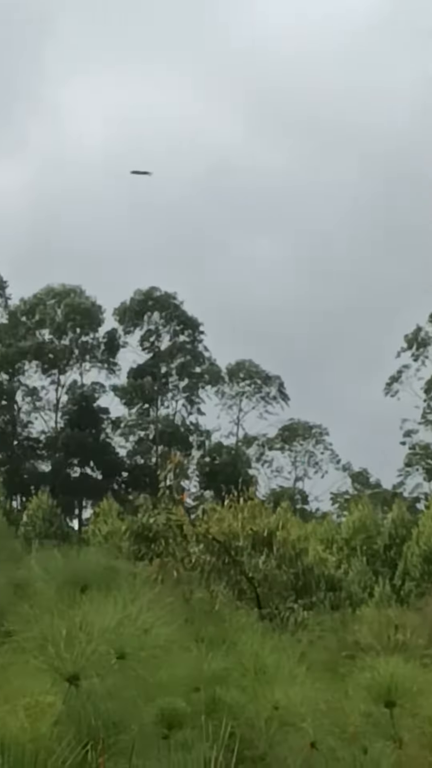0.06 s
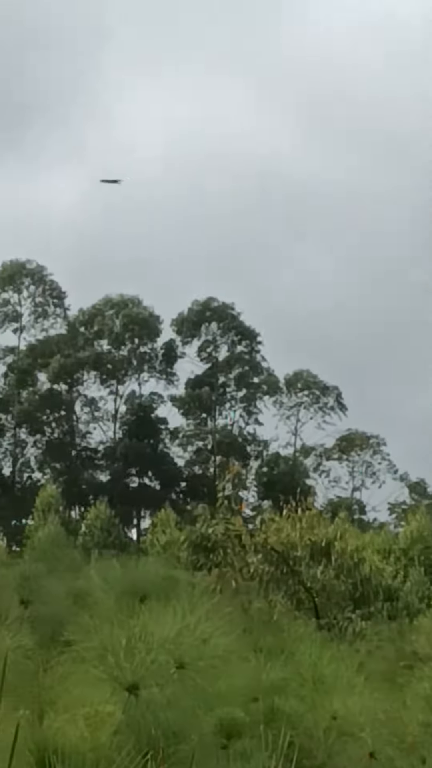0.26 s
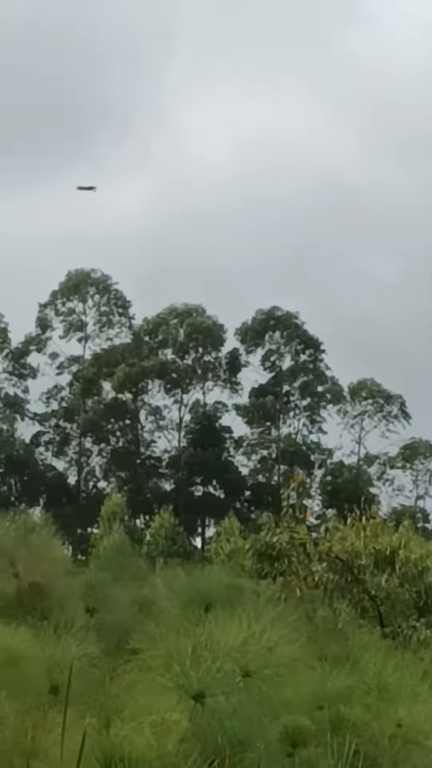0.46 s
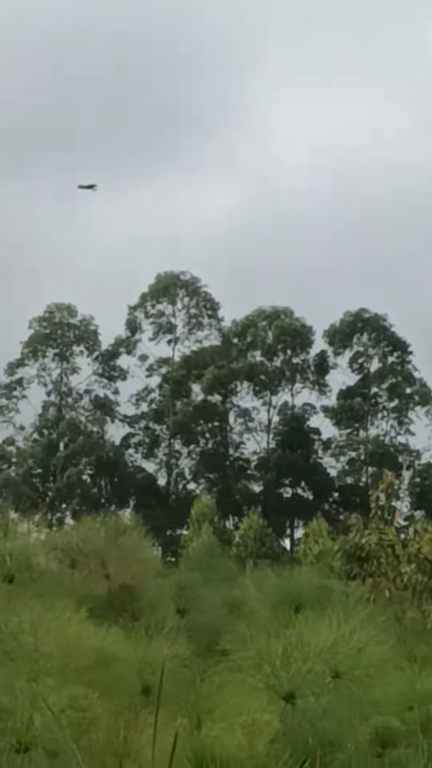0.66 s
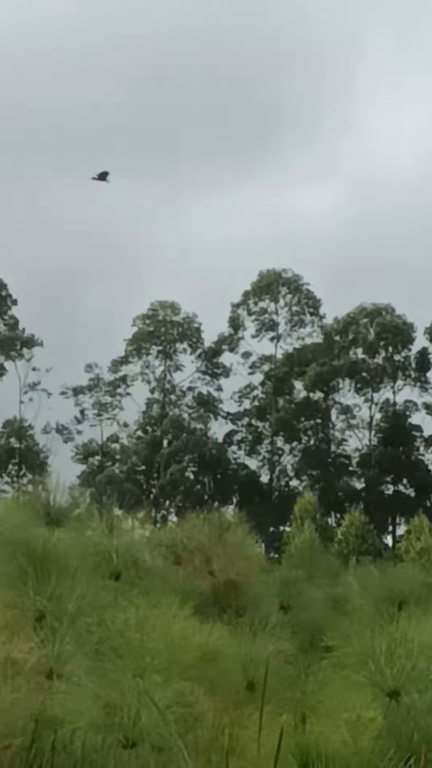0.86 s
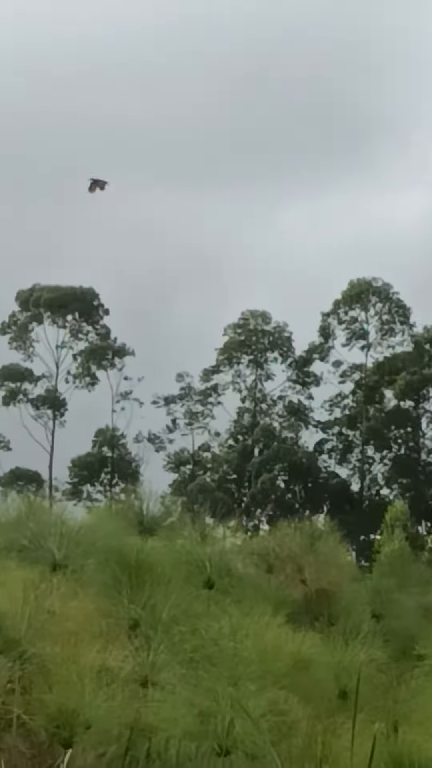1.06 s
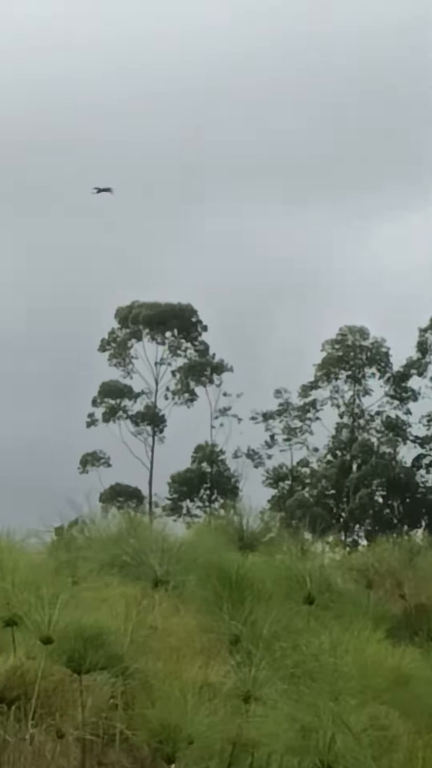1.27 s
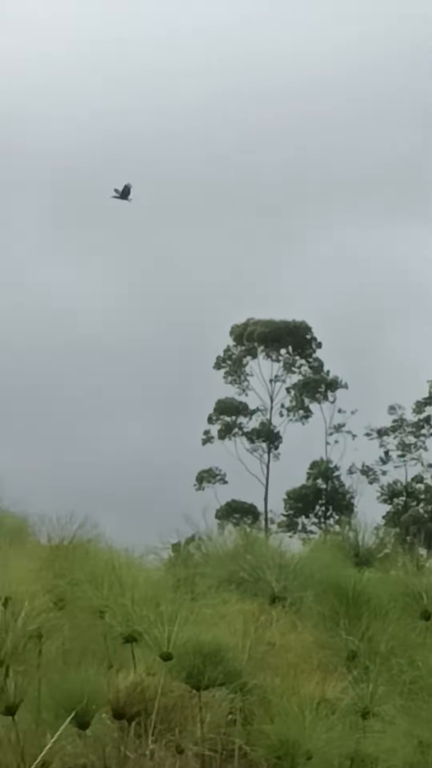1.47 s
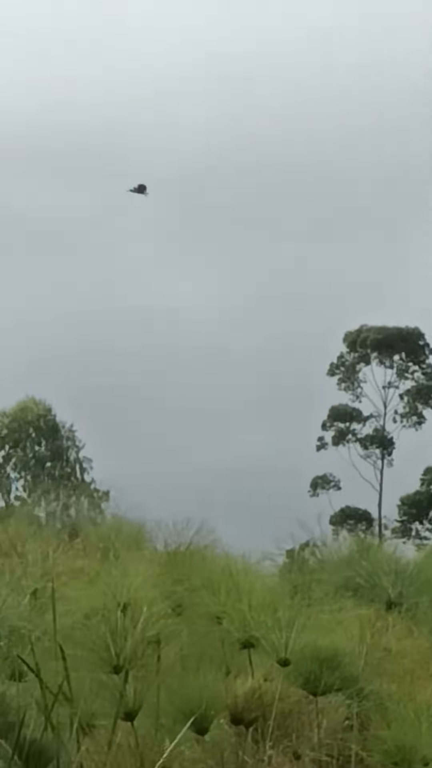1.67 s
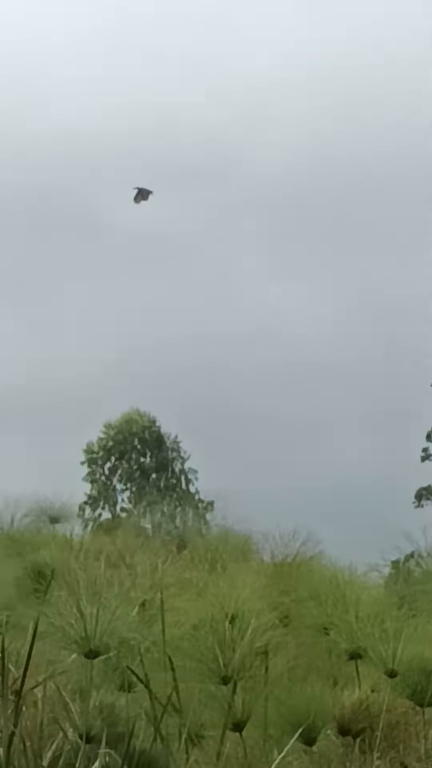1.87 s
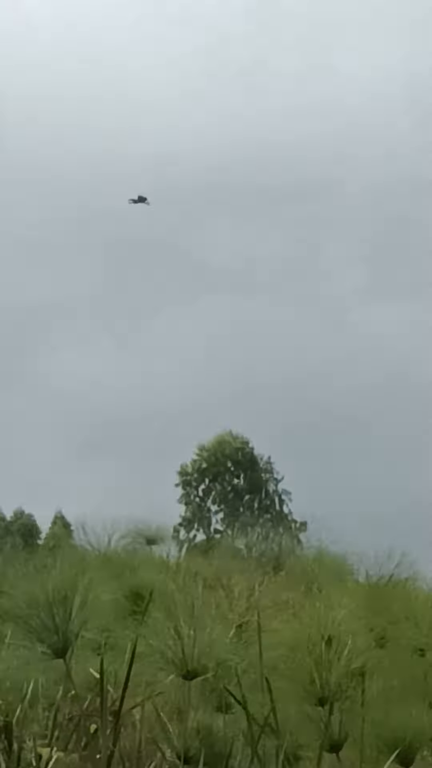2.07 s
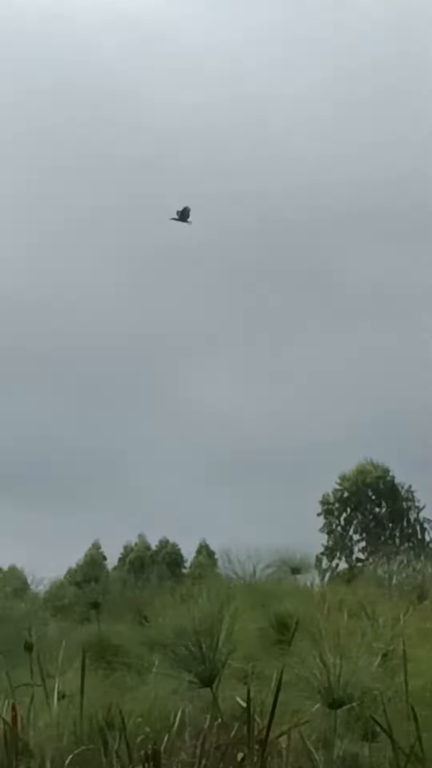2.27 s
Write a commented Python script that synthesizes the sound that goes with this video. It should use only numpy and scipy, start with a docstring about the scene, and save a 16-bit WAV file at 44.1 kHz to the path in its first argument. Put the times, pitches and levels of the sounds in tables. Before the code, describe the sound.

A loud ibis cry dominates from about 0.2 to 1.3 seconds: nasal and bright, hoarse at both ends, scooping up fast, sagging slowly, then dropping, with a soft echo off trees. Thin high insect buzz runs throughout, with sharp paired ticks in bursts near 0, 0.5-0.85, 1.2-1.45 and 1.8-2.0. A faint far bird answers around 1.5, tiny notes later; light wind rumbles under faint hiss.

```python
"""A marsh: insects buzz steadily in throbbing noise bands, one ticks in runs of paired falling chirps,
and a light wind rumbles on the microphone as low noise under a faint hiss.
An ibis gives one long nasal cry that scoops up, sags and drops away: harmonics, with rasp and jitter
making both ends hoarse. Decaying noise scatters it off reeds and echoes it off a line of trees.
Far birds answer faintly with a short harmonic call and gliding sine notes."""
import sys
import numpy as np
from scipy import signal
from scipy.fft import rfft, irfft
from scipy.io import wavfile

SR = 44100
rng = np.random.default_rng(int(sys.argv[2]) if len(sys.argv) > 2 else 0)


def persist_wave(psi):
    """Save psi, clipped to +-1, as 16-bit WAV."""
    counts = np.round(np.clip(psi, -1, 1) * 32767).astype(np.int16)
    wavfile.write(sys.argv[1], SR, np.atleast_2d(counts).T)


N = 101430


def undb(db):
    """Decibels to amplitude gain."""
    return 10 ** (np.asarray(db) / 20)


def unit(x):
    """Scale to rms 1."""
    return x / np.sqrt(np.mean(x ** 2))


def curve(table, axis=1):
    """Table column, interpolated linearly in time."""
    rows = np.array(table)
    return np.interp(np.arange(N) / SR, rows[:, 0], rows[:, axis])


def response(table, hz):
    """Gain of a (f/Hz, level/dB) table, interpolated over log frequency."""
    rows = np.array(table)
    level_db = np.interp(np.log(np.maximum(hz, 1)), np.log(rows[:, 0]), rows[:, 1])
    return undb(level_db)


def shape(x, gain):
    """Filter by a gain that is a function of frequency, zero-padded against wrap-around."""
    hz = np.arange(N + 1) * SR / (2 * N)
    return irfft(rfft(x, 2 * N) * gain(hz), 2 * N)[..., :N]


def walk(rate_hz, count=4096):
    """Smooth random curve of rms 1: noise under a Gaussian lowpass of the given rate."""
    hz = np.arange(count // 2 + 1) * SR / N
    coarse = irfft(rfft(rng.standard_normal(count)) * np.exp(-(hz / rate_hz) ** 2))
    return np.interp(np.linspace(0, count - 1, N), np.arange(count), unit(coarse))


def wide_noise(alike):
    """Stereo noise; alike is the power share common to both channels."""
    alike = np.clip(alike, 0, 1)
    common = np.sqrt(alike) * rng.standard_normal(N)
    return common + np.sqrt(1 - alike) * rng.standard_normal((2, N))


def scatter(x, t60_s, buildup_s):
    """Countless weak reflections that build up and die away: convolution with decaying noise."""
    t = np.arange(N) / SR
    tail = wide_noise(0.6) * undb(-60 * t / t60_s) * (1 - np.exp(-(t / buildup_s) ** 2))
    return signal.fftconvolve(x[None], unit(tail) / np.sqrt(N), axes=1)[:, :N]


def choirs():
    """Many far insects, each kind throbbing in its own narrow noise band."""
    # insect kinds: [centre f/Hz, width/Hz, mean level/dB, mean throb rate/Hz, throb depth 0-1]
    kinds = [(5440,450,-57,210,0.55),(6140,330,-68.5,50,0.2),(7130,420,-62.5,48,0.4),(7840,360,-66.5,27,0.47)]
    out = 0
    for centre_hz, width_hz, level_db, rate_hz, depth in kinds:
        band = unit(shape(wide_noise(0.23), lambda f: 1 / (1 + (2 * (f - centre_hz) / width_hz) ** 2 / 2)))
        throb_hz = rate_hz * (1 + 0.1424 * walk(9.4))
        throb = 1 + depth * np.sin(2 * np.pi * np.cumsum(throb_hz) / SR)
        out = out + undb(level_db + 0.3 * walk(1.3)) * unit(band * throb)
    return out


def air():
    """Open-country hiss and gusty wind rumble, both filtered noise; the rumble is nearly mono."""
    # open-air hiss spectrum: [f/Hz, relative level/dB]
    hiss_spectrum = [(150,-1.5),(300,-7.5),(600,-9),(1200,-12),(2500,-17),(4000,-12),(6500,-33.5),(9000,-18.5),(10800,-18),(12000,-27),(15500,-26)]
    # wind rumble spectrum: [f/Hz, relative level/dB]
    wind_spectrum = [(15,-18),(28,-6),(42,-10),(55,0.5),(80,-4.5),(120,-11),(170,-28.5),(300,-23.5),(1000,-83)]
    hiss_db, wind_mean_db, gust_rms_db = -61.5, -56.5, 2
    hiss = unit(shape(wide_noise(0.42), lambda f: response(hiss_spectrum, f)))
    wind = unit(shape(wide_noise(0.97), lambda f: response(wind_spectrum, f)))
    return undb(hiss_db) * hiss + undb(wind_mean_db + gust_rms_db * walk(12)) * wind


def ticker():
    """Pairs of wing strokes, each a Gaussian chirp falling in pitch, with short scatter."""
    # runs of stroke pairs: [start t/s, end t/s, pair period/s, mean level of second stroke/dB]
    runs = [(-.0055,.18,0.037,-48.5),(0.484,.57,0.038,-43.5),(.583,.85,.0405,-48.5),(1.191,1.45,0.05,-52),(1.783,2.01,.0408,-54)]
    pair_gap_s, centre_hz, detune_rms = 0.0085, 8253, 0.004
    sigma_s, fall_hz_per_s = 0.0014, 100000
    t, out = np.arange(N) / SR, np.zeros(N)
    for start_s, end_s, period_s, level_db in runs:
        for pair_s in np.arange(start_s, end_s - pair_gap_s, period_s):
            for at_s, stroke_db in ((pair_s, -2), (pair_s + pair_gap_s, 0)):
                size_db, detune = rng.standard_normal(2)
                u = t - at_s
                near = abs(u) < 0.01
                u = u[near]
                cycles = centre_hz * (1 + detune_rms * detune) * u - fall_hz_per_s * u ** 2 / 2
                envelope = np.exp(-(u / sigma_s) ** 2 / 2)
                out[near] += undb(level_db + stroke_db + size_db) * envelope * np.sin(2 * np.pi * cycles)
    return out + undb(-10) * scatter(out, t60_s=0.2, buildup_s=0.0013)


def ibis():
    """Reedy voice: low harmonics, treble fading differently in each ear, and pitch-pulsed rasp."""
    # pitch of the cry: [t/s, f/Hz]
    pitch = [(.222,335),(.243,423.7),(.261,470),(.301,519.3),(.355,548.5),(.405,554.9),(.53,544),(.6,534.3),(.783,503.4),(1.101,475.2),(1.149,467.3),(1.181,437),(1.251,424),(1.33,337.8)]
    # cry levels before trim: [t/s, 2nd harmonic/dB, 3rd/dB, 4th/dB, whole treble/dB]
    cry_levels = [(0.225, -53.5, -50.5, -43, -53), (0.25, -61, -51, -33, -45.5),
                  (0.29, -55.5, -35.5, -39, -33.5), (0.315, -55, -33, -50, -38),
                  (0.37, -56, -27, -34.5, -30.5), (0.46, -56.5, -29.5, -38, -30),
                  (0.51, -51, -23, -37, -35.5), (0.555, -51, -31, -43.5, -32), (0.59, -50, -27, -49, -31),
                  (0.665, -51, -38, -46.5, -34), (0.76, -50.5, -35, -42, -34.5),
                  (0.83, -49.5, -38, -48, -36), (0.92, -52.5, -37.5, -40, -35.5),
                  (1.04, -55, -36.5, -33, -33.5), (1.13, -61.5, -41, -44, -41.5),
                  (1.16, -59, -44.5, -34.5, -40), (1.24, -55, -50.5, -40.5, -37.5),
                  (1.33, -54, -60, -48.5, -50.5)]
    # weak harmonics between two throat resonances: [t/s, 5th harmonic/dB, 6th/dB]
    valley = [(0.23, -55, -50), (0.3, -54, -57), (0.42, -48, -67), (0.55, -55, -59.5), (0.65, -45, -51.5),
              (0.8, -59, -51), (0.95, -55, -59), (1.08, -61.5, -54), (1.16, -52, -45), (1.23, -51, -55),
              (1.33, -54, -62)]
    # hoarseness: [t/s, roughness 0-1]
    roughness = [(.22,.9),(.26,.52),(.3,.48),(.36,.09),(.55,.06),(.7,.11),(1.1,.08),(1.17,.28),(1.25,.44),(1.33,.75)]
    # throat and bill resonances colouring the treble: [f/Hz, relative level/dB]
    throat = [(2400,-14),(2900,-7.5),(3350,-25),(3800,0),(4150,-16),(4500,-4),(5400,2),(6200,-9),(7200,-19.5),(8500,-24.5),(9800,-12.5),(10600,-28.5),(11600,-20.5),(13000,-38.5),(15000,-78)]
    # rasp spectrum: [f/Hz, relative level/dB]
    rasp_spectrum = [(400,-35),(900,-12),(1500,-20),(2000,8),(2500,-35),(3300,-3.5),(5500,7),(7500,-16),(10000,-13),(14000,-41)]
    fundamental_db, body_trim_db, treble_trim_db, rasp_db = -52.5, -1.5, -3, -35
    waver, jitter, shimmer, jitter_rate_hz = 0.002, 0.034, 0.4, 260
    flutter_rms_db, fading, fading_rate_hz = 1.5, 0.5, 11.7
    attack_s, release_s, rasp_fade_db_per_s = 0.026, 0.038, 10

    t = np.arange(N) / SR
    rough = np.clip(curve(roughness), 0, 1)
    hz = curve(pitch) * (1 + waver * walk(36.2))
    phase = 2 * np.pi * np.cumsum(hz * (1 + jitter * rough * walk(jitter_rate_hz))) / SR

    # fundamental weakens with falling pitch and with hoarseness
    body = undb(fundamental_db) * (hz / hz.max()) ** 2 * (1 - rough / 2) * np.sin(phase)
    for k in range(2, 5):
        body += undb(curve(cry_levels, axis=k - 1) + body_trim_db) * np.sin(k * phase)
    for k in range(5, 7):
        body += undb(curve(valley, axis=k - 4) + flutter_rms_db * walk(39)) * np.sin(k * phase)
    body *= 1 + shimmer * rough * walk(jitter_rate_hz)

    treble, power = 0, 0
    for k in range(7, 29):
        gain = response(throat, k * hz)
        own_phase = k * phase + 2 * np.pi * rng.random()
        sine, cosine = np.sin(own_phase), np.cos(own_phase)
        stray = fading * (walk(fading_rate_hz) * sine + walk(fading_rate_hz) * cosine)
        steady = undb(flutter_rms_db * walk(42)) * sine
        # stray part has opposite sign in the two channels
        treble = treble + gain * (steady + stray * np.array([[1], [-1]]))
        power = power + gain ** 2 * (1 + 2 * fading ** 2)
    treble *= undb(curve(cry_levels, axis=4) + treble_trim_db) / np.sqrt(power)

    pulsed_noise = rng.standard_normal(N) * (1 + np.cos(phase))
    rasp = unit(shape(pulsed_noise, lambda f: response(rasp_spectrum, f)))
    force = np.clip(hz / hz.max(), 0, 1) * undb(-rasp_fade_db_per_s * t)
    attack = np.clip((t - cry_levels[0][0]) / attack_s + 0.5, 0, 1)
    release = np.clip((cry_levels[-1][0] - t) / release_s + 0.5, 0, 1)
    # sqrt(2): sine levels are rms
    voice = np.sqrt(2) * (body + treble) + undb(rasp_db) * rough * force * rasp
    return attack * release * voice


def marsh(cry):
    """Direct cry leaning left by frequency, plus reed scatter and a dull, long echo off trees."""
    # lean of the direct cry: [f/Hz, left over right/dB]
    lean = [(500,3.5),(1000,7),(1600,10),(2000,0),(2300,0),(5000,2),(12000,1.5)]
    trees_top_hz = 2700
    direct = shape(cry, lambda f: response(lean, f) ** np.array([[0.5], [-0.5]]))
    sent = cry.mean(axis=0)
    reeds = scatter(sent, t60_s=0.18, buildup_s=0.029)
    trees = scatter(sent, t60_s=2.21, buildup_s=0.022)
    trees = shape(trees, lambda f: 1 / (1 + (f / trees_top_hz) ** 4) ** 0.5)
    return direct + undb(-16) * reeds + undb(-12) * trees


def swell(start_s, length_s):
    """Rounded rise and fall: square root of a half sine."""
    progress = np.clip((np.arange(N) / SR - start_s) / length_s, 0, 1)
    return np.sqrt(abs(np.sin(np.pi * progress)))


def far_birds():
    """Short answer of resonance-weighted harmonics and faint gliding sines, blurred by scatter."""
    # pitch of the far answer: [t/s, f/Hz]
    answer = [(1.52,344.3),(1.57,512.6),(1.62,592),(1.645,507.4),(1.68,380)]
    # faint notes: [start t/s, length/s, starting f/Hz, glide/(Hz/s), peak level/dB]
    notes = [(0.772,.34,643.5,-110,-58),(1.845,.1,3740,-1100,-63),(1.848,0.076,740,0,-63.5),(2.242,0.13,3520,800,-69)]
    answer_db, centre_hz, width_hz = -59, 1600, 900
    t, hz = np.arange(N) / SR, curve(answer)
    phase = 2 * np.pi * np.cumsum(hz * (1 + 0.0094 * walk(190))) / SR
    out = np.zeros(N)
    for k in range(2, 6):
        out += np.sin(k * phase) / (1 + ((k * hz - centre_hz) / width_hz * 2) ** 2)
    out *= undb(answer_db) * swell(answer[0][0], answer[-1][0] - answer[0][0])
    for start_s, length_s, note_hz, glide_hz_per_s, level_db in notes:
        u = t - start_s
        cycles = note_hz * u + glide_hz_per_s * u ** 2 / 2
        out += undb(level_db) * swell(start_s, length_s) * np.sin(2 * np.pi * cycles)
    return out + undb(-8) * scatter(out, t60_s=0.3, buildup_s=0.01)


def scene():
    """Sum of insects, air and birds."""
    return choirs() + air() + ticker() + marsh(ibis()) + far_birds()


def record(dry):
    """Left channel louder and slightly late; steep elliptic lowpass on both."""
    left_over_right_db, left_lag_s, top_hz = 3.7, 0.00094, 15700
    left = shape(dry[0], lambda f: np.exp(-2j * np.pi * f * left_lag_s))
    both = np.array([left * undb(left_over_right_db / 2), dry[1] * undb(-left_over_right_db / 2)])
    lowpass = signal.ellip(8, 0.2, 70, top_hz, fs=SR, output="sos")
    return signal.sosfilt(lowpass, both)


dry = scene()
out = record(dry)
persist_wave(out)
```